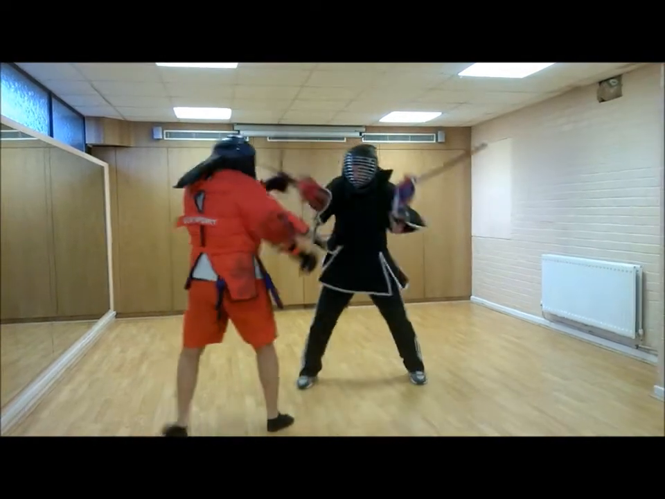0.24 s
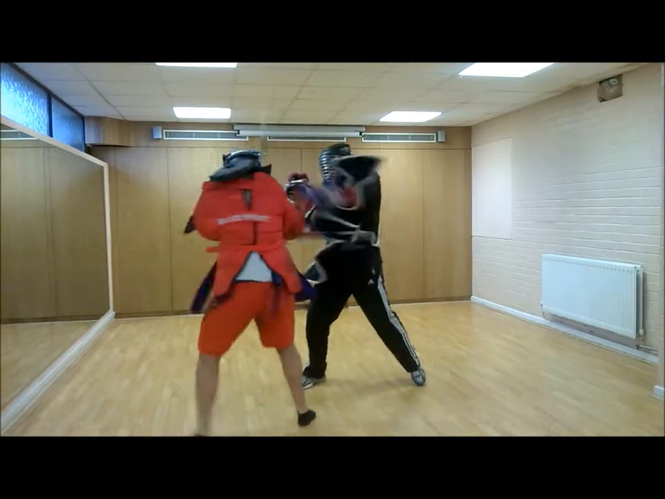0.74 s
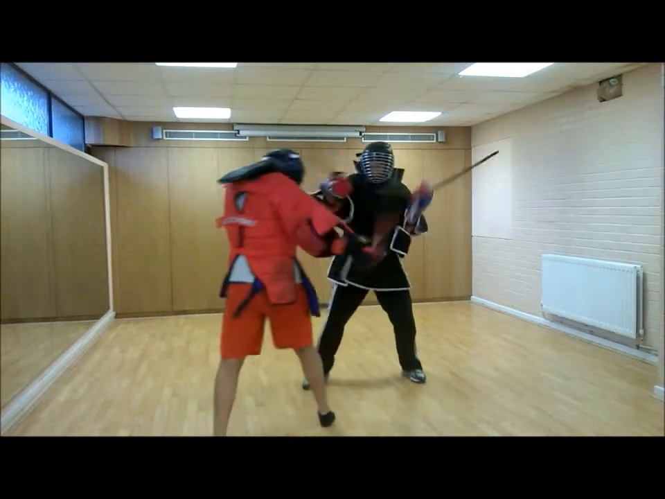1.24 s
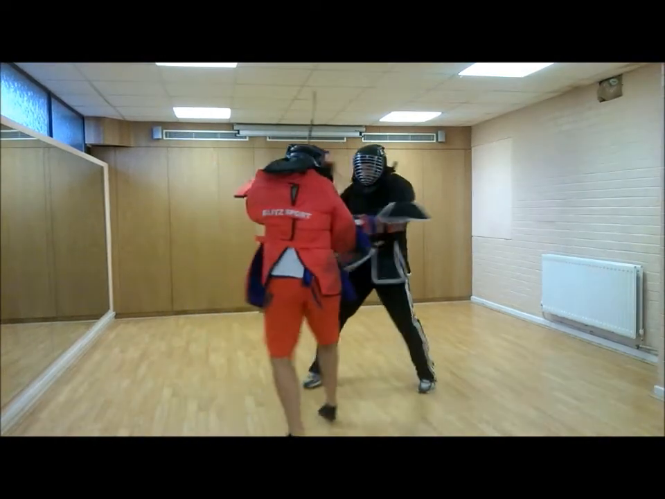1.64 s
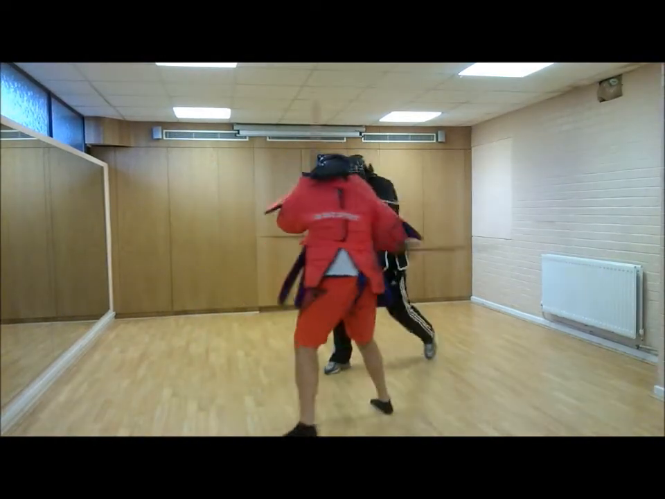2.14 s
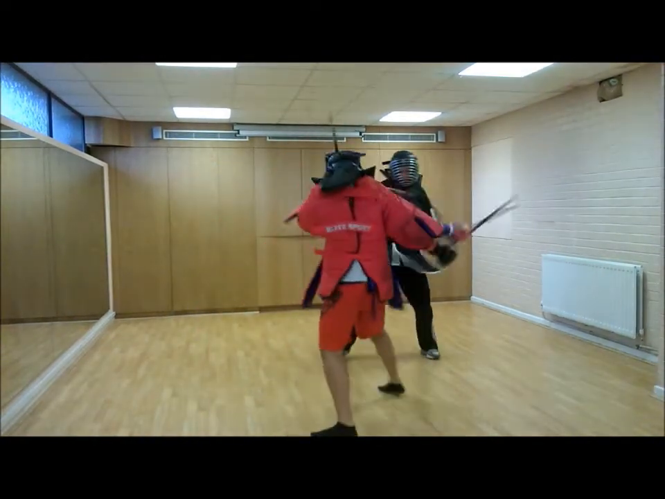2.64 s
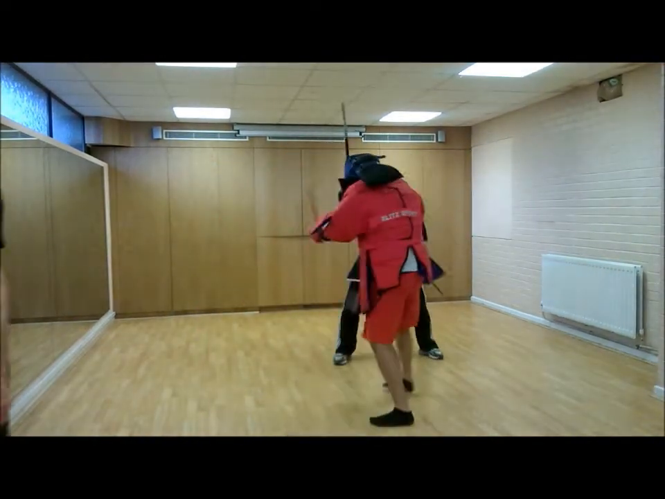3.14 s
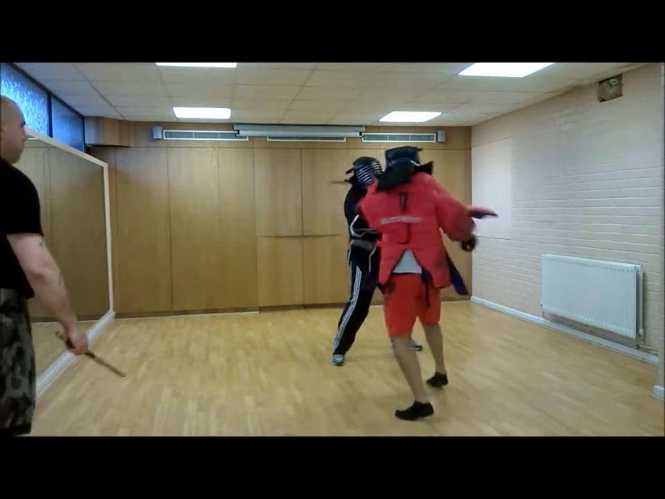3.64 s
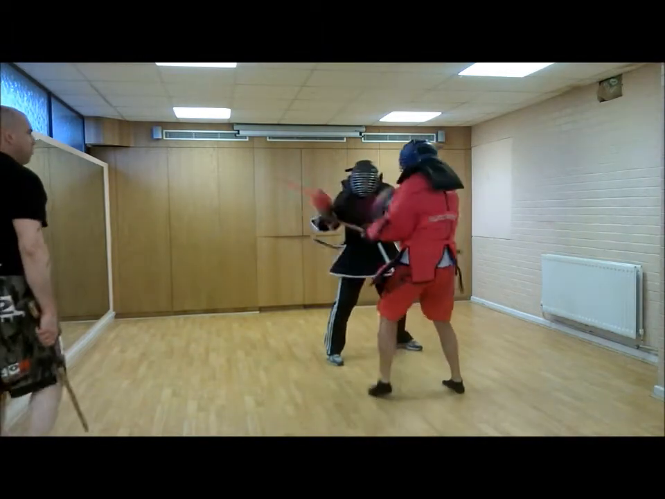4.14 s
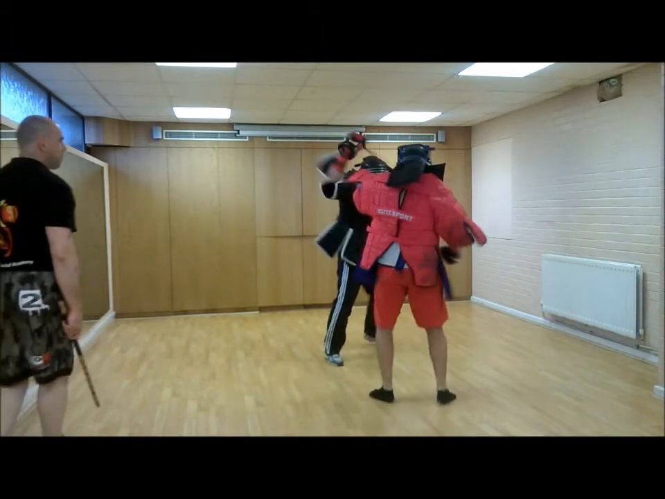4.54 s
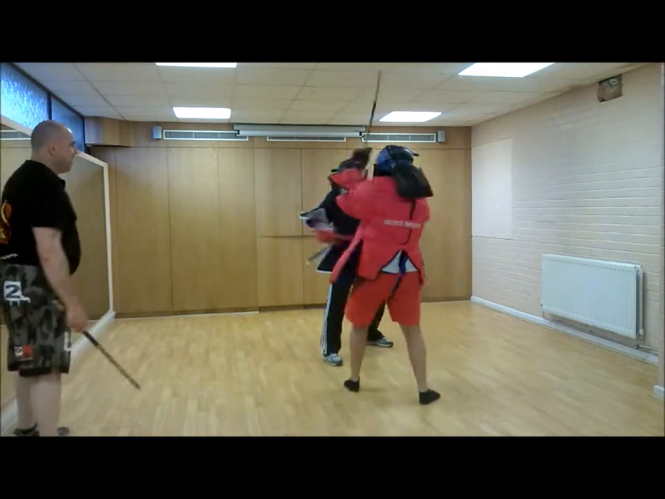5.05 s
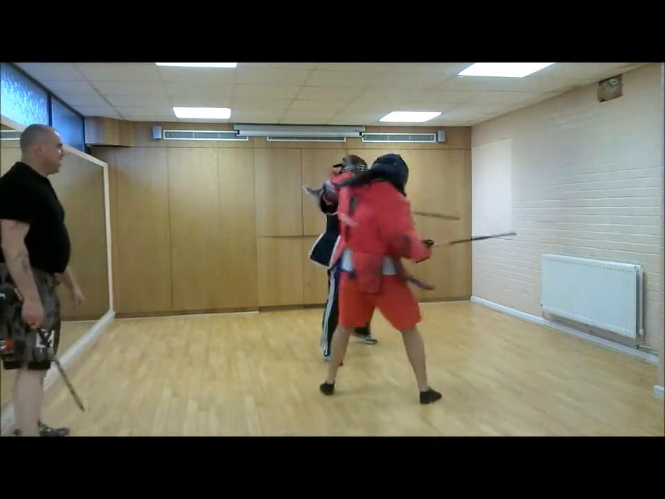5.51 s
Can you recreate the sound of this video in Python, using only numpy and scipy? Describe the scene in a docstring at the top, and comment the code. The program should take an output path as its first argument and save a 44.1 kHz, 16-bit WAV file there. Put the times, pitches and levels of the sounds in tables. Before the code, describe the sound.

Rattan sticks strike from the very first moment, heard from a few metres away in a hard-walled hall that gives each blow a short echo. Until about 2.7 seconds the hits come quickly and unevenly, mixing bright stick clacks with slaps and thuds on padded armour; sharp cracks stand out at the start and near 0.9, 2.1 and 2.6 seconds. Heavy steps boom on the wooden floor between 0.5 and 1.5 seconds. A loud glancing scrape comes at 3 seconds, followed by a few more hits and a heavy padded thud with a stamp at 3.5. Short swipes over cloth lead to another thud at 4.1 and a hard clack at 4.4. Two dull blows land just after 5 seconds, then a scrape at 5.4 and a few faint brushes up to about 5.8. Faint room noise lies underneath throughout.

```python
"""A hard-walled hall with a sprung wooden floor, where two fighters spar with rattan sticks.
Each contact is a brief force filtered by the body it excites: stick on stick gives a bright clack,
stick on padded armour a slap and a thud, and glancing strokes scrape over cloth by friction.
Stamping feet set the floor's modes booming. Every blow returns from floor, ceiling and walls
as early reflections and a diffuse tail, over faint room noise."""
import sys
import numpy as np
from scipy import signal
from scipy.fft import rfft, irfft
from scipy.io import wavfile
from scipy.ndimage import uniform_filter1d

SR = 44100
rng = np.random.default_rng(int(sys.argv[2]) if len(sys.argv) > 2 else 0)


def unload_audio(sound):
    """Save the sound as a 16-bit wav file, at the path given as the first command line argument."""
    columns = np.transpose(np.atleast_2d(sound))
    # keep every value between -1 and 1, then stretch to whole-number steps
    steps = np.round(np.clip(columns, -1, 1) * 32767)
    wavfile.write(sys.argv[1], SR, steps.astype(np.int16))


N = 254744
RING = 32768  # samples in one contact's sound
T = np.arange(RING) / SR
FREQ = np.maximum(np.arange(RING // 2 + 1) * SR / RING, 1)


def undb(db):
    """Amplitude grows tenfold for every 20 dB."""
    return 10 ** (np.asarray(db) / 20)


def unit(x):
    """Energy is the sum of squares; scale it to one."""
    return x / np.sqrt(np.sum(x ** 2))


def along(hz, points):
    """Pitch is logarithmic: interpolate (Hz, value) points over log frequency."""
    f, value = np.transpose(points)
    return np.interp(np.log(hz), np.log(f), value)


def add(out, start_s, sound):
    """Superposition: mix a sound in, unit energy counting as unit rms over a twentieth of a second."""
    i = max(int(start_s * SR), 0)
    out[i:i + len(sound)] += np.sqrt(SR / 20) * sound[:N - i]


def minimum_phase(gain):
    """Causality: the spectrum with this gain whose response starts at once and then rings out."""
    cepstrum = irfft(np.log(gain + 1e-7), RING)
    cepstrum[1:RING // 2] *= 2
    cepstrum[RING // 2 + 1:] = 0
    return np.exp(rfft(cepstrum))


def resonance(hz, width_hz, lift_db):
    """A damped mode makes a Lorentzian peak or dip in a flat spectrum."""
    return np.sqrt(1 + (undb(lift_db) ** 2 - 1) / (1 + (2 * (FREQ - hz) / width_hz) ** 2))


def chatter(envelope, grain_db):
    """Dense small contacts of uneven size sum to a grainy noise."""
    noise, size = rng.standard_normal((2, RING))
    return unit(envelope * noise * undb(grain_db * size))


# The hall's background spectrum. Each row: frequency in Hz, relative spectral density in dB.
AIR_SPECTRUM = [(25, 1), (60, -6), (120, -2), (300, -6), (1000, -15), (3000, -21), (8000, -20),
                (15000, -25.5)]
def air(level_db=-50, stir_db=2):
    """Amplitude modulation: faint room noise stirs slowly with the moving clothes."""
    hz = np.maximum(np.arange(N // 2 + 1) * SR / N, 1)
    noise = irfft(rfft(rng.standard_normal(N)) * undb(along(hz, AIR_SPECTRUM)), N)
    knots = np.arange(0, N + SR, SR // 10)
    stir = np.interp(np.arange(N), knots, rng.standard_normal(len(knots)))
    return noise / noise.std() * undb(level_db + stir_db * stir)


# The hall's decay. Each row: frequency in Hz, reverberation time (60 dB fall) in seconds.
HALL_DECAY = [(100, 0.42), (260, 0.41), (700, 0.36), (1800, 0.37), (4800, 0.42), (9000, 0.41),
              (14000, 0.27)]
# Standing waves that colour the tail. Each row: frequency in Hz, width in Hz, lift in dB.
HALL_MODES = [(208, 84, 2), (247, 18, -4.5), (316, 7, 3.5), (433.6, 11.2, 5.5), (540, 110, 3),
              (750, 7.6, -2)]
def hall_tail(force, build_s=0.0038):
    """Reverberation: a contact's power fills the hall, then decays exponentially band by band."""
    colour = np.prod([resonance(*mode) for mode in HALL_MODES], axis=0)
    noise = rfft(chatter(1, grain_db=2)) * colour
    filled = signal.fftconvolve(force ** 2, np.exp(-T / build_s) * T)[:RING].clip(0)
    tail = 0
    for hz, t60 in HALL_DECAY:
        band = along(FREQ, [(f, f == hz) for f, _ in HALL_DECAY])
        kept_per_sample = undb(-60 / (t60 * SR)) ** 2
        power = signal.lfilter([1], [1, -kept_per_sample], filled)
        tail = tail + irfft(noise * band, RING) * np.sqrt(power)
    return unit(tail)


# Echoes off floor, ceiling and walls. Each row: delay in seconds, level in dB re the direct sound.
ECHOES = [(.0029, 3.5), (.0099, -5.5), (0.0116, 5), (0.014, -5), (0.0215, -2.5), (.026, -10)]
def early_sound(force):
    """Reflection: delayed copies follow the direct sound, their paths varying as the fighters move."""
    paths = np.zeros(RING)
    paths[0] = 1
    for delay_s, db in ECHOES:
        delay_s *= 1 + 0.05 * rng.standard_normal()
        paths[int(abs(delay_s) * SR)] += undb(db)
    return unit(signal.fftconvolve(force, paths)[:RING])


def across_hall(force, body_gain, early_db):
    """Source and filter: the force, early sound plus tail, sets the timing; the body sets the colour."""
    early = undb(early_db)
    heard = (early * rfft(early_sound(force)) + rfft(hall_tail(force))) / np.sqrt(1 + early ** 2)
    # level the broad trend below 1 kHz: the bass belongs to the blow, whatever path it takes
    bass = 1 / (1 + (FREQ / 1000) ** 4)
    trend = uniform_filter1d(np.abs(heard) ** 2, size=200) ** bass
    fade = np.minimum(1, 10 * (1 - T / T[-1]))
    return fade * irfft(heard * minimum_phase(body_gain / np.sqrt(trend)), RING)


def floor_mode(hz, t60, push_s=0.0015):
    """Damped oscillation: one mode of the floor, pushed softly by a heel."""
    hz *= 1 + 0.023 * rng.standard_normal()
    onset = 1 - np.exp(-T / push_s)
    return np.sin(2 * np.pi * hz * T) * undb(-60 * T / t60) * onset


# Floorboard modes. Each row: frequency in Hz, time to fall 60 dB in seconds, relative level in dB.
BOARD_MODES = [(78.4, 0.66, -19), (107.5, 0.53, -13), (133.8, 0.52, -11.5)]
# Heavy steps. Each row: start in seconds, boom level in dB, board level in dB.
STEPS = [(0.454, -56, -37), (0.539, -51, -24.5), (0.723, -38, -29.5), (1.263, -44, -27.5),
         (1.517, -38, -25), (2.898, -46, -43), (3.188, -57, -32.5), (3.497, -29.5, -29), (4.14, -47, -51),
         (5.049, -47, -46)]
def steps(boom_hz=40, boom_t60=0.64):
    """Modal vibration: under a heel the whole sprung floor booms and the boards ring higher."""
    out = np.zeros(N)
    for start_s, boom_db, board_db in STEPS:
        boards = sum(undb(db) * floor_mode(hz, t60) for hz, t60, db in BOARD_MODES)
        boom = floor_mode(boom_hz, boom_t60)
        add(out, start_s, undb(boom_db) * unit(boom) + undb(board_db) * unit(boards))
    return out


# What each material radiates. Each lists, in dB: body thud, pad slap, wood knock, stick crack, hiss.
PADDING = (0, -3.1, -31, -20, -24)
FIRM_GUARD = (-10, 1.14, -0.3, -9.5, -24)
BARE_STICK = (-32.5, -21.5, -7, 4.5, -14)
CLOTH = (-40, -12, -16, -8, 1.5)
def material_levels(strength_db, hardness, cloth_db, full_blow_db=-17.5):
    """Harder spots and stronger blows radiate more treble; brushed cloth adds its own power."""
    by_band = zip(PADDING, FIRM_GUARD, BARE_STICK)
    thud, slap, knock, crack, hiss = (np.interp(hardness, [0, 0.5, 1], dbs) for dbs in by_band)
    bright_db = 0.57 * (strength_db - full_blow_db)
    spot = undb(strength_db) * undb([thud, slap, knock, crack + bright_db, hiss + bright_db])
    return 20 * np.log10(np.hypot(spot, undb(cloth_db) * undb(CLOTH)))


# Bands of thud, slap, knock, crack and hiss. Each row: low edge in Hz, high edge in Hz, slope exponent.
BODY_BANDS = [(162, 296, 3.37), (383, 1030, 3.1), (1000, 2750, 8.2), (2300, 5320, 5.96),
              (6995, 11500, 11.8)]
def struck_body(levels_db, ring):
    """Incoherent bands add in power, each shaped by the resonances, to give the struck body's gain."""
    *_, crack_db, hiss_db = levels_db
    hiss_stretch = 2 ** (0.025 * np.clip(hiss_db - crack_db, -6, 7))  # cloth hisses higher than wood
    power = 0
    for (low, high, slope), db, stretch in zip(BODY_BANDS, levels_db, [1, 1, 1, 1, hiss_stretch]):
        band = ring ** 2 / (1 + (low / FREQ) ** slope) / (1 + (FREQ / (high * stretch)) ** slope)
        power = power + undb(db) ** 2 * band / band.mean()
    return np.sqrt(power)


# Bending modes of a rattan stick. Each row: frequency in Hz, width in Hz, greatest lift or dip in dB.
STICK_MODES = [(780, 57, 4), (1370, 190, 1.5), (2000, 130, 0.5), (2680, 120, -6.5), (3700, 450, 3.5),
               (5340, 210, 9.5)]
def stick_ring(overtone_db=1.0):
    """Bending modes shift with the grip and vary with the contact point; knotty cane adds overtones."""
    grip = 1 + 0.13 * rng.standard_normal()
    modes = [resonance(hz * grip, width, db * rng.uniform(0.19, 1)) for hz, width, db in STICK_MODES]
    grid_hz = np.arange(0, SR / 2, 70)
    ripple = rng.standard_normal(len(grid_hz)) * (grid_hz > STICK_MODES[0][0])
    return np.prod(modes, axis=0) * undb(overtone_db * np.interp(FREQ, grid_hz, ripple))


# Glancing strokes and scuffs. Each row: start in seconds, strength in dB, hardness from 0 to 1,
# cloth level in dB.
SWIPES = [(.5, -29, 0.9, -41), (1.746, -40.5, 0.08, -52), (2.974, -14.5, 0.71, -28), (2.998, -30, 1, -29.5),
          (3.666, -27.5, 0.77, -58), (3.736, -31.5, 0.8, -46), (3.883, -29.5, 0.61, -22.5),
          (4.018, -36.5, 0.3, -61), (4.143, -48, .85, -22), (4.196, -19, 0.64, -50),
          (4.616, -26.5, 0.71, -26.5), (5.147, -33.5, 0.77, -59), (5.366, -22, 0.78, -37.5),
          (5.528, -37.5, 0.16, -51.5), (5.585, -43, 1, -52.5), (5.729, -46, 1, -60)]
def swipes(swell_s=0.007):
    """Sliding friction: sticks, sleeves and soles shed grains of force that swell and fade."""
    out = np.zeros(N)
    for start_s, strength_db, hardness, cloth_db in SWIPES:
        force = chatter(T * np.exp(-T / swell_s), grain_db=0.5)
        gain = struck_body(material_levels(strength_db, hardness, cloth_db), stick_ring())
        add(out, start_s, across_hall(force, gain, early_db=-6))
    return out


# Direct blows. Each row: start in seconds, contact time in seconds, strength in dB, hardness from
# 0 (padding) to 1 (bare stick), cloth level in dB, ring frequency in Hz, ring lift in dB.
STRIKES = [(.001, 0.0015, -17.5, 0.8, -35, 3170, 4), (0.1243, 0.0073, -23.3, .5, -42.5, 890, 3.5),
           (.273, 0.00091, -22.5, 0.79, -36.5, 1550, 5), (.455, 0.0047, -30.5, 0.36, -40.5, 300, 7),
           (0.5393, .0024, -13.5, 0.15, -22.5, 600, 4.5), (.7168, 0.0014, -22, 0.35, -42, 895, 13),
           (.798, 0.015, -23, 0.74, -48, 3700, 5), (.947, 0.0014, -15.5, 0.83, -31.5, 3530, 4.5),
           (1.184, 0.0059, -33.7, 0.42, -48.5, 1960, 12), (1.2621, 0.0012, -19.5, .25, -29, 596, 7.5),
           (1.431, 0.0085, -23, .96, -38, 2800, 2.5), (1.512, 0.0033, -15.5, 0.37, -23, 1000, 0.5),
           (1.797, 0.0078, -23.5, 0.85, -39.5, 2730, 5.5), (2.079, 0.0067, -19.5, 0.71, -31.5, 1240, 8),
           (2.089, 0.027, -15.5, 0.66, -23.5, 2760, 8), (2.243, 0.01, -21.5, 0.41, -37.5, 594, 7.5),
           (2.412, 0.011, -16, .61, -24, 890, 6.5), (2.6358, 0.0023, -14.5, 0.87, -23.5, 1410, 2.5),
           (2.891, 0.0024, -25, 0.28, -46.5, 344, 6), (3.188, 0.0023, -24.3, 0.36, -34, 555, 10),
           (3.196, 0.0067, -18.5, 0.55, -30, 2080, 2.5), (3.46, 0.024, -26.5, 0.51, -38.5, 464, 10),
           (3.49, .0036, -12.5, 0.13, -24, 247, 10.5), (4.105, 0.0075, -32, 0.9, -62, 2000, 2),
           (4.138, .011, -11.5, 0.09, -26, 384, 8.5), (4.437, 0.022, -15, 0.77, -31, 4000, 4),
           (5.021, 0.019, -24, 0.14, -36, 414, 2), (5.072, 0.022, -19, .03, -39, 380, 13)]
def strikes(relative_width=0.18, damping_hz=35, early_db=-4):
    """Impact excitation: a snap and a short chatter ring the struck pad or stick at its own pitch."""
    out = np.zeros(N)
    beam_db = 3 * np.exp(-np.log(FREQ / 800) ** 2)  # flat pads beam their middle tones across the hall
    treble_db = along(FREQ, [(2500, 0), (10000, 4)])  # walls and air soak up the tail's treble
    for start_s, contact_s, strength_db, hardness, cloth_db, hz, lift_db in STRIKES:
        force = chatter(np.exp(-T / contact_s), grain_db=7.5)
        force[0] += 1.7 / (1 + (contact_s / 0.006) ** 2)  # the snap, softer in long contacts
        ring = stick_ring() * resonance(hz, relative_width * hz + damping_hz, lift_db)
        gain = struck_body(material_levels(strength_db, hardness, cloth_db), ring)
        add(out, start_s, across_hall(force, gain, early_db + beam_db + treble_db))
    return out


def scene():
    """Superposition: blows, glancing strokes, footwork and room noise sum in one channel."""
    return (strikes() + swipes() + steps() + air())[None]


def record(dry, top_hz=15900):
    """Soft saturation rounds the sharpest peaks, and a steep low-pass cuts the highest treble."""
    lowpass = signal.ellip(10, 0.2, 80, top_hz, fs=SR, output="sos")
    return signal.sosfilt(lowpass, np.tanh(dry))


dry = scene()
out = record(dry)
unload_audio(out)
```